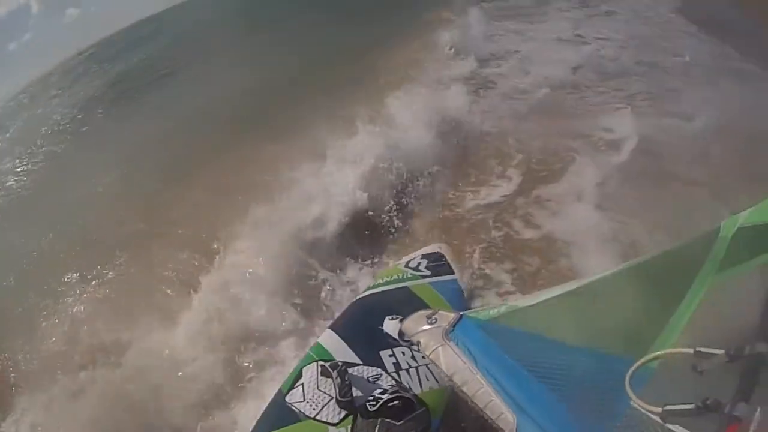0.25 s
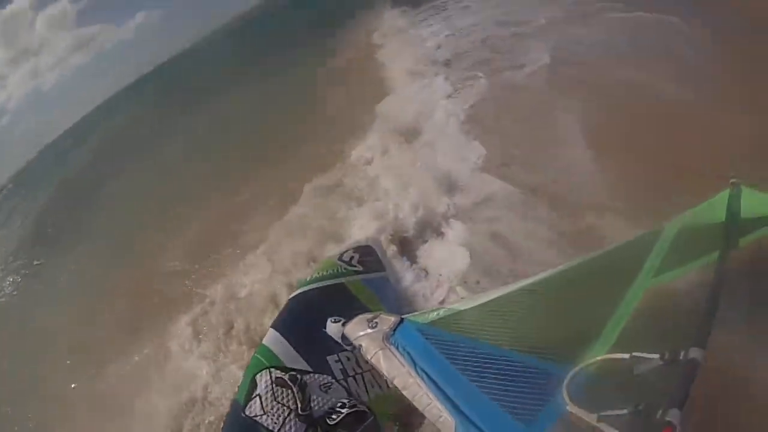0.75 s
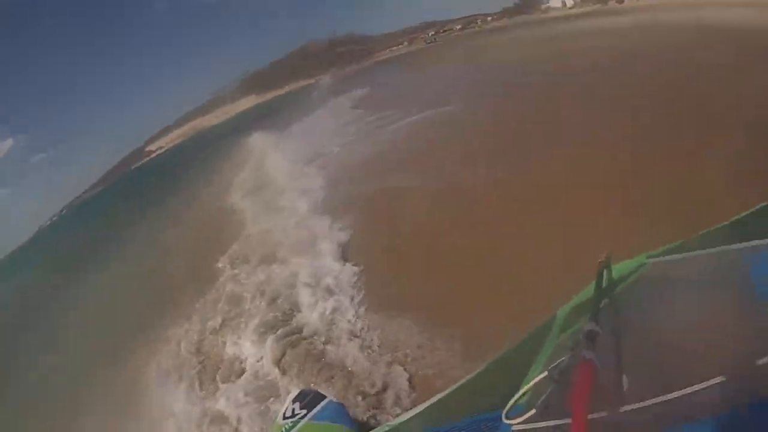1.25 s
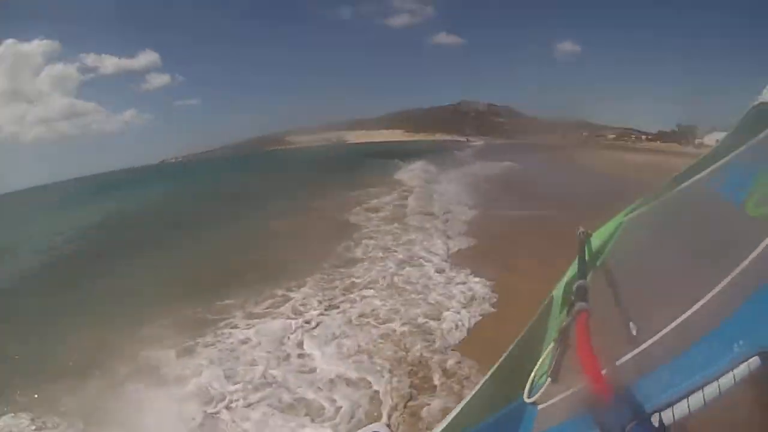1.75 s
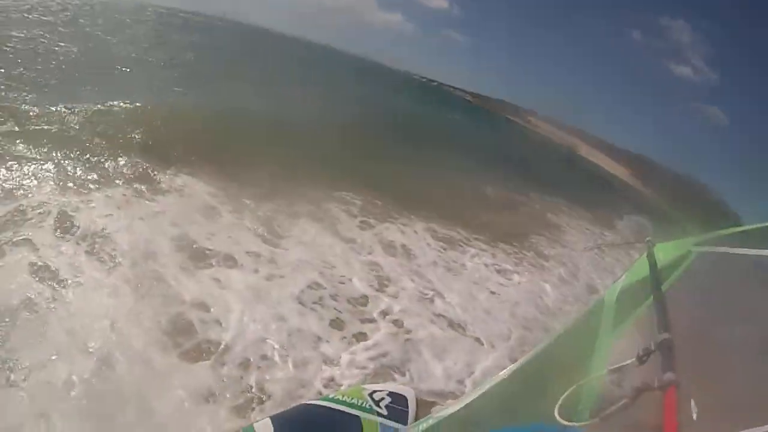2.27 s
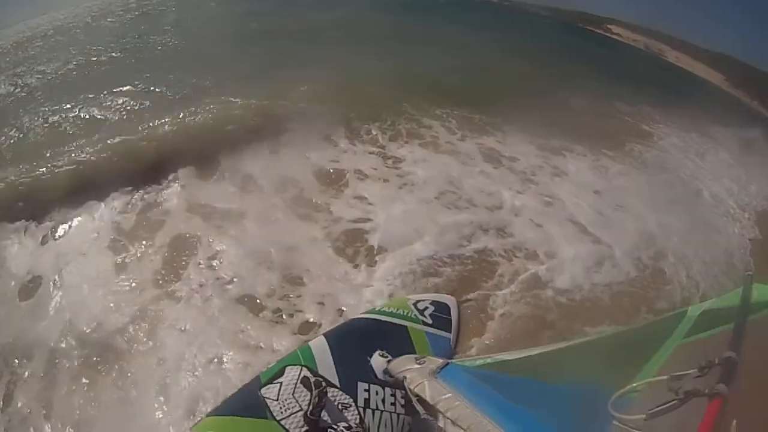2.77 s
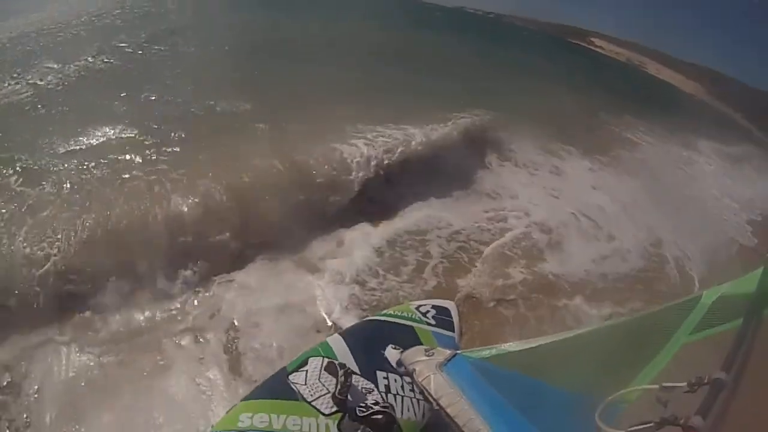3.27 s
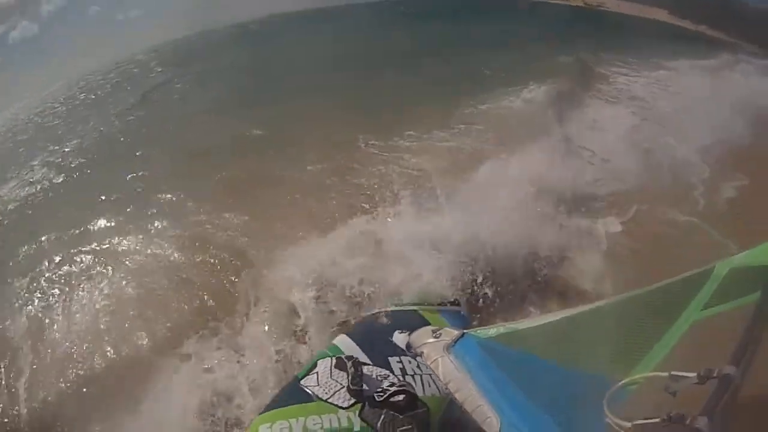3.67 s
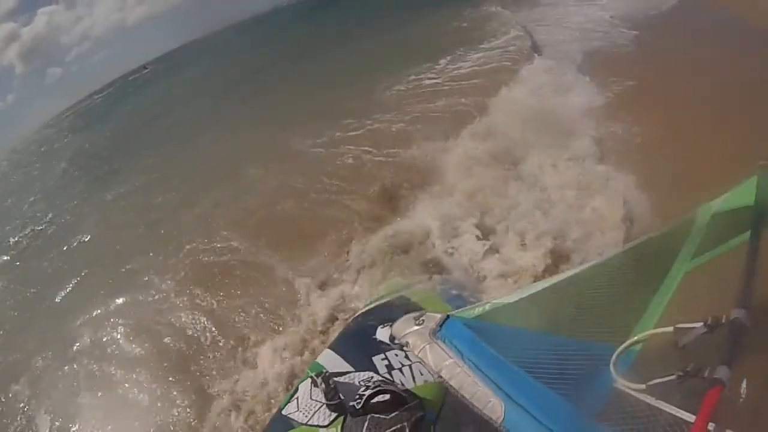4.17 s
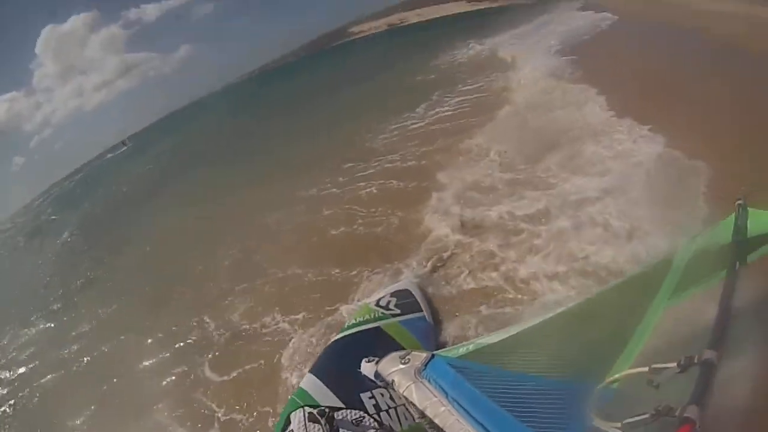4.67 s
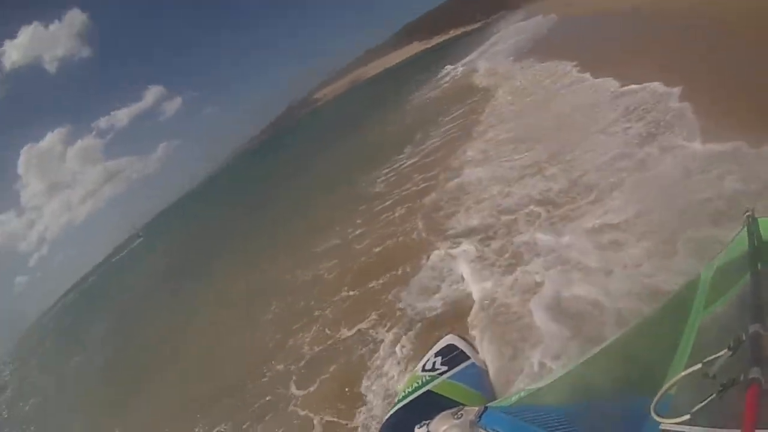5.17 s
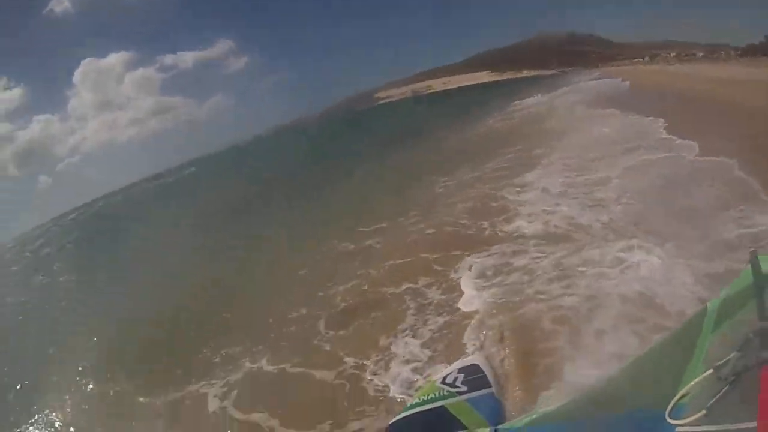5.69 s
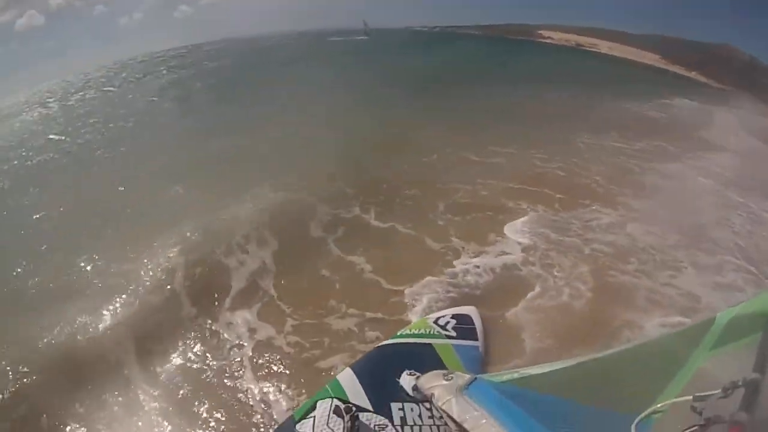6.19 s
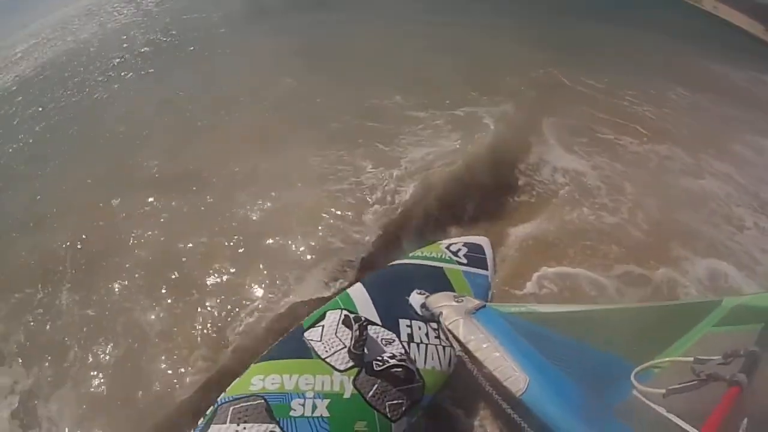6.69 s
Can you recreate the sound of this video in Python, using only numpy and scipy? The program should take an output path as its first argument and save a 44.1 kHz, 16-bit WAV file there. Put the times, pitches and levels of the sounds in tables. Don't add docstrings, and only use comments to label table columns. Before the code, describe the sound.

Inside a sealed housing, the surf sounds close, hollow and mono, with faint hiss underneath. It begins with strong foamy wash, bright spray and wet ticks, fading from about 0.5 s. Near 1.1 s the mount jolts with a low thump, hollow knock and small slap; the water is thinnest around 1.7 s. Wash rebuilds from 2 s, with a cluster of knocks at 2.5-2.8 s and fluttering gusts. Spray and a dull wave thud peak around 3-3.8 s, then drop back. Deep wind shoves hit near 3.9 s, and a brief wavering whistle peaks around 4.25 s. A sharp slap and click come at 4.77 s, amid faint grainy cloth rubbing until 5.3 s. Water calms, with a deep wind push at 5.5 s and a soft slap at 5.6 s. The hardest slap lands at 6.48 s, followed by splashy ticks and rising wash to the end near 6.9 s.

```python
import sys
import numpy as np
from scipy import signal
from scipy.fft import rfft, irfft
from scipy.io import wavfile
from scipy.ndimage import uniform_filter1d

SR = 44100
rng = np.random.default_rng(int(sys.argv[2]) if len(sys.argv) > 2 else 0)


def generate_wav(sig):
    pcm = np.round(np.clip(np.atleast_2d(sig).T, -1, 1) * 32767).astype(np.int16)
    wavfile.write(sys.argv[1], SR, pcm)


def decibels_to_gain(level_db):
    exponent = np.asarray(level_db, float) / 20
    return 10 ** exponent


N = 306054

# time in seconds, wash level in dB, airborne spray in dB over the wash.
SHORE_BREAK = [(0, -49, -6.5), (.46, -52, -5.5), (.7, -55, -8.5), (.97, -57.5, -7.5), (1.14, -60.5, -5.5),
               (1.68, -66.5, -3.5), (2.13, -63, -8), (2.45, -57.5, -9.5), (2.8, -55, -13), (3.05, -52, -6),
               (3.8, -51, -3), (4.0, -57.5, -5), (4.5, -57.5, -6.5), (4.93, -61, -5.5), (5.43, -64.5, -7),
               (6.47, -62, -8.5), (6.62, -50.5, -9), (6.94, -46.5, -7.5)]
MEAN_WASH_DB = -57


def rms_one(x):
    return x / np.sqrt(np.mean(x ** 2) + 1e-20)


def in_time(rows):
    s, *columns = np.transpose(rows)
    return [np.interp(np.arange(N) / SR, s, c) for c in columns]


def drift(rate_hz):
    stride = 40
    r = np.exp(-2 * np.pi * stride * rate_hz / SR)
    draws = rng.standard_normal(N // stride + 2002)
    slow = signal.lfilter([1], [1, -2 * r, r * r], draws)[2000:]
    return np.interp(np.arange(N) / stride, np.arange(len(slow)), rms_one(slow))


def coloured(x, spectrum):
    hz, db = np.transpose(spectrum)
    bins_hz = np.arange(N // 2 + 1) * SR / N + 1
    gain = decibels_to_gain(np.interp(np.log(bins_hz), np.log(hz), db))
    return rms_one(irfft(rfft(x) * gain, N))


def band(x, lo_hz, hi_hz):
    return signal.sosfilt(signal.butter(2, [lo_hz, hi_hz], "band", fs=SR, output="sos"), x)


def ring(clicks, hz, t60):
    r, w = decibels_to_gain(-60 / (t60 * SR)), 2 * np.pi * hz / SR
    return signal.lfilter([0, np.sin(w)], [1, -2 * r * np.cos(w), r * r], clicks + 1e-18)


def swell(length_s):
    t = np.arange(round(6 * length_s * SR)) / SR * 4 / length_s
    return t * np.exp(1 - t)


def add(out, s, sound):
    i = round(s * SR)
    out[i:i + len(sound)] += sound[:N - i]


def lumps(rows, column, steady_db):
    t = np.arange(N) / SR
    power = decibels_to_gain(steady_db) ** 2
    for row in rows:
        power = power + decibels_to_gain(row[column]) ** 2 * np.exp(-((t - row[0]) / row[1]) ** 2)
    return np.sqrt(power)


def foam(spectrum, per_s, spread_db, grain_share, patchy_db):
    sizes = decibels_to_gain(spread_db * np.minimum(rng.exponential(1, N), 4.)) * rng.choice([-1, 1], N)
    pops = sizes * (rng.random(N) < per_s * decibels_to_gain(4 * drift(8)) / SR)
    rush = rng.standard_normal(N)
    raw = coloured(np.sqrt(grain_share) * rms_one(pops) + np.sqrt(1 - grain_share) * rush, spectrum)
    together = drift(47)
    edges = np.geomspace(spectrum[0][0] * .7, min(spectrum[-1][0] * 1.2, 19000), 6)
    patches = []
    for lo, hi in zip(edges, edges[1:]):
        patches.append(band(raw, lo, hi) * decibels_to_gain(patchy_db * (together + 1.9 * drift(33))))
    return sum(patches[::2]) - sum(patches[1::2])


def housing(x):
    # frequency in Hz, width in Hz, boost in dB.
    wall_modes = [(1110, 59, 9), (1552, 410, 9.5), (1915, 62, 3.5), (2352, 600, 9), (3270, 470, 1),
                  (3750, 170, 1), (3700, 4500, -2.5), (4355, 860, -8), (4910, 220, 6.5), (5370, 400, 0.5),
                  (6110, 280, -8), (6700, 470, 1.5), (8540, 1400, -5), (11150, 670, 2), (12100, 860, 1)]
    for hz, width_hz, boost_db in wall_modes:
        a, w = decibels_to_gain(boost_db / 2), 2 * np.pi * hz / SR
        q = np.sin(w) * width_hz / hz / 2
        zeros = [1 + q * a, -2 * np.cos(w), 1 - q * a]
        poles = [1 + q / a, -2 * np.cos(w), 1 - q / a]
        x = signal.lfilter(zeros, poles, x)
    return x


def surf():
    # frequency in Hz, level in dB per Hz.
    thud_colour = [(35, -34), (60, -7.5), (199, 1), (674, -8.5), (980, -11), (1300, -10.5), (1690, -41),
                   (2860, -120)]
    wash_colour = [(410, -17), (700, -12), (1300, -7.5), (1540, -5.5), (2290, -3), (3000, -18.5),
                   (3900, -40), (6600, -120)]
    trickle_colour = [(1590, -35), (2700, -8.5), (3660, 1.5), (3970, 0.5), (4700, -3), (6110, -37),
                      (10300, -120)]
    spray_colour = [(2650, -27), (4500, -4), (5560, 3), (7420, -8), (8330, -13), (11300, -16.5),
                    (13600, -23.5), (15000, -30.5)]
    # centre in seconds, half length in seconds, thud in dB.
    dumping_wave = (3.32, 0.32, -55)
    # centre in seconds, half length in seconds, wash, spray, trickle in dB.
    near_splashes = [(.48, 0.0073, -47.5, -69, -55), (1.77, 0.055, -64.5, -71, -68.5),
                     (2.18, 0.022, -61, -77, -67), (2.55, .04, -57, -67, -68),
                     (2.76, 0.05, -57, -63.5, -73), (2.92, 0.013, -58, -68, -67),
                     (3.01, 0.039, -51, -51.5, -60), (3.23, 0.065, -53.5, -60, -61),
                     (3.63, 0.11, -52, -58, -59), (3.8, 0.1, -67, -71, -58.5), (4.31, 0.094, -55, -74, -61),
                     (4.36, 0.065, -58, -66, -63), (4.76, .08, -60, -68, -73), (5.14, 0.18, -63, -74, -74),
                     (5.59, 0.015, -61.5, -78, -70), (6.24, 0.046, -75, -71, -84),
                     (6.487, 0.01, -53, -64, -64), (6.64, 0.037, -60, -68, -73),
                     (6.82, 0.13, -51, -61, -72)]

    wash_db, spray_db = in_time(SHORE_BREAK)
    swing_db = wash_db - MEAN_WASH_DB
    thud_db = -60 + 0.34 * swing_db
    trickle_db = -65.5 + 0.97 * swing_db
    thud = foam(thud_colour, per_s=730, spread_db=3.5, grain_share=0.064, patchy_db=0.8)
    wash = housing(foam(wash_colour, per_s=1500, spread_db=6.0, grain_share=0.2, patchy_db=0.38))
    trickle = housing(foam(trickle_colour, per_s=750, spread_db=-2.5, grain_share=0.22, patchy_db=0.5))
    spray = housing(foam(spray_colour, per_s=2300, spread_db=3.0, grain_share=0.17, patchy_db=0.61))
    return (lumps([dumping_wave], column=2, steady_db=thud_db) * rms_one(thud)
            + lumps(near_splashes, column=2, steady_db=wash_db) * decibels_to_gain(1.5) * rms_one(wash)
            + lumps(near_splashes, column=3, steady_db=wash_db + spray_db) * decibels_to_gain(-1.86) * rms_one(spray)
            + lumps(near_splashes, column=4, steady_db=trickle_db) * rms_one(trickle))


def eddies(lo_hz, hi_hz, even_s):
    swing = band(band(rng.standard_normal(N), lo_hz, hi_hz), 0.82 * lo_hz, 1.36 * hi_hz)
    return rms_one(swing / np.sqrt(uniform_filter1d(swing ** 2, round(even_s * SR)) + 1e-9))


def wind():
    # time in seconds, buffet in dB, flutter in dB.
    breeze = [(0, -61, -64.5), (.9, -58, -70), (1.5, -62.5, -65), (2.3, -67, -56.5), (3.5, -58.5, -61.5),
              (4.4, -64, -62.5), (5.3, -60.5, -70.5), (6.3, -62.5, -60.5), (6.94, -61.5, -58.5)]
    # centre in seconds, half length in seconds, buffet in dB, flutter in dB.
    gusts = [(.23, 0.034, -70, -58.5), (.49, .04, -55.5, -69), (.81, 0.041, -58, -63),
             (.99, 0.016, -49.5, -58), (1.07, 0.044, -52, -52.5), (1.25, 0.077, -68, -59.5),
             (1.62, 0.068, -58, -62.5), (1.79, 0.05, -54, -56.5), (2.03, 0.041, -60, -60),
             (2.09, 0.035, -64, -53), (2.36, 0.053, -57, -63), (2.44, 0.12, -75, -56.5),
             (2.6, 0.085, -51, -56.5), (2.76, 0.028, -56, -57), (2.84, 0.054, -71, -52.5),
             (2.97, 0.074, -54, -52), (3.18, 0.034, -56, -61), (3.32, 0.048, -53, -70),
             (3.6, 0.084, -55, -54), (3.79, 0.026, -67, -54.5), (3.97, 0.026, -48, -61),
             (4.13, 0.035, -49, -63), (4.55, 0.028, -56, -65), (4.68, 0.04, -54, -65),
             (5.03, 0.045, -58, -78), (5.39, 0.15, -62, -62), (5.53, 0.03, -58, -73),
             (5.9, 0.17, -54.5, -62), (6.62, 0.059, -60, -62), (6.79, 0.025, -64, -61)]
    wander_db = 1
    buffet_db, flutter_db = in_time(breeze)
    buffet = lumps(gusts, column=2, steady_db=buffet_db + wander_db * drift(2.7))
    flutter = lumps(gusts, column=3, steady_db=flutter_db + wander_db * drift(4.2))
    return buffet * eddies(12.3, 43.7, even_s=0.071) + flutter * eddies(38.0, 117.6, even_s=0.2)


def cavity():
    # time in seconds, level in dB.
    mouth_wind = [
        (0, 0.5),
        (.9, 0.5),
        (1.3, -3),
        (1.6, -6),
        (2.2, -2),
        (3.2, 2),
        (4.6, 3.5),
        (5.5, 2),
        (6.4, -0.5),
        (6.94, -6),
    ]
    # centre in seconds, half length in seconds, level in dB.
    puffs = [(1.1, 0.027, -54), (1.27, .04, -58), (1.74, .03, -57), (1.8, .02, -58), (1.845, .015, -58),
             (2.345, .01, -55), (2.44, .03, -58), (2.535, 0.011, -46), (2.6, 0.058, -49.5),
             (2.77, 0.03, -60), (3.345, .015, -50), (3.52, .04, -52), (3.62, .03, -52), (3.71, .02, -50),
             (3.82, 0.017, -44), (4.24, 0.055, -50), (4.37, 0.076, -58), (4.75, 0.053, -53),
             (5.1, 0.079, -61.5), (6.63, .04, -51.5), (6.88, 0.023, -59)]
    air = band(band(rng.standard_normal(N), 1386, 1810), 1393, 1660)
    swing_db = in_time(SHORE_BREAK)[0] - MEAN_WASH_DB
    flicker_db = 1.5 * drift(7.6)
    steady_db = -57.5 + 0.87 * swing_db + in_time(mouth_wind)[0] + flicker_db
    gain = lumps(puffs, column=2, steady_db=steady_db) * decibels_to_gain(-4.5)
    return np.minimum(gain, decibels_to_gain(-47.5)) * rms_one(air)


def narrow_rush(rows, width):
    out, rush = np.zeros(N), rng.standard_normal(N)
    for s, half_s, db, hz in rows:
        i = max(round((s - 3 * half_s) * SR), 0)
        j = min(round((s + 3 * half_s) * SR), N)
        fade = np.exp(-((np.arange(i, j) / SR - s) / half_s) ** 2 / 2)
        out[i:j] += decibels_to_gain(db) * fade * rms_one(band(rush[i:j], hz * (1 - width), hz * (1 + width)))
    return out


def sheets():
    # centre in seconds, half length in seconds, level in dB, resonance in Hz.
    water_sheets = [(.08, 0.087, -63, 5300), (0.38, 0.13, -63.5, 5200), (0.76, 0.14, -68, 5100),
                    (.2, .2, -65, 3300), (.65, 0.19, -72, 3260), (.25, .2, -70, 6800),
                    (3.5, .25, -68, 6800), (1.34, 0.12, -67, 2340), (1.52, 0.055, -71, 2200),
                    (2.5, 0.043, -71, 6700), (2.3, 0.052, -71, 4770), (2.92, .02, -71, 10500),
                    (2.92, .02, -74, 12200), (2.92, .015, -70, 7500), (3.03, .035, -64, 6600),
                    (5.592, 0.0071, -62, 2700), (5.595, .008, -67, 3200), (6.53, .04, -70, 5200),
                    (4.3, .04, -63, 3550), (4.33, 0.055, -64, 3000), (4.38, 0.051, -59, 2400),
                    (4.35, 0.027, -70, 6650), (6.456, 0.0068, -59, 5300), (6.484, 0.0078, -63, 5300),
                    (6.605, 0.012, -58, 5200), (6.65, 0.012, -60, 5300), (6.705, 0.017, -56, 5200),
                    (6.817, 0.018, -60, 5400), (6.66, .035, -73, 11000), (6.735, .015, -67, 9600),
                    (6.74, .02, -69, 11300), (2.985, .015, -68, 11500), (3.065, .008, -67, 11000),
                    (2.975, .012, -58, 5300), (3.04, .012, -58, 5300)]
    return narrow_rush(water_sheets, width=0.068)


def drops():
    # start in seconds, ring in dB, ring in Hz, tick in dB, tick brightness in dB per octave.
    lens_drops = [(0.191, -35, 5000, -62, 0), (0.4206, -50, 4900, -46, 3), (0.6194, -52, 5350, -69, 0),
                  (1.398, -40, 5830, -53, -7), (1.5833, -55, 3780, -58, -2), (2.5496, -47, 4030, -56, -3),
                  (2.6199, -55, 3620, -62, 0), (2.9672, -46, 5470, -59, 0), (3.022, -43, 5200, -45, 2),
                  (4.1194, -50, 5900, -53, 1), (4.6352, -58, 3770, -51, 5), (5.1696, -57, 3900, -72, 0),
                  (5.4053, -58, 5300, -47, -4), (5.508, -49, 3770, -53, 2), (6.4443, -42, 5250, -58, -2),
                  (6.4517, -48, 5400, -55, 9), (6.5949, -55, 5000, -70, 0), (6.678, -55, 5200, -56, 5),
                  (6.733, -55, 5200, -52, 4), (6.9037, -34, 4850, -63, 0)]
    # frequency in Hz, level in dB, t60 in seconds.
    cover_modes = [(5300, 0, .004), (6230, 2, 0.0045), (7270, 2, 0.005), (8340, -4, 0.004),
                   (10800, -3, .004), (11700, -6, .004), (13800, -22, .003)]
    out, t = np.zeros(N), np.arange(1200) / SR
    luck_db = rng.normal(0, 1.5, (len(lens_drops), len(cover_modes)))
    for (s, db, hz, tick_db, bright_db), extra_db in zip(lens_drops, luck_db):
        t60 = 43 / hz * (5000 / hz) ** 1.5
        tone = decibels_to_gain(db + 1.0 - 60 * t / t60) * (1 - np.exp(-t / 0.0008)) * np.sin(2 * np.pi * hz * t)
        tick = 0
        for (mode_hz, mode_db, mode_t60), e in zip(cover_modes, extra_db):
            tilt_db = bright_db * np.log2(mode_hz / 7500)
            tick = tick + decibels_to_gain(mode_db + e + tilt_db) * ring(t == 0, mode_hz, mode_t60)
        tick = (1 - np.exp(-t / .0003)) * band(tick, 4500, 14500)
        add(out, s + .0005, tone + decibels_to_gain(tick_db + 4.5) * tick)
    return out


def thumps():
    # start in seconds, peak in dB, pitch in Hz.
    jolts = [
        (1.054, -58, 129),
        (1.091, -40, 110),
        (1.1, -47, 240),
        (1.109, -43.5, 126),
        (1.118, -49.5, 220),
        (1.165, -45, 102),
    ]
    out, push = np.zeros(N), swell(.02)
    t = np.arange(len(push)) / SR
    for s, db, hz in jolts:
        add(out, s, decibels_to_gain(db - 3.0) * push * np.sin(2 * np.pi * hz * t))
    return out


def pressure_humps(rows):
    out = np.zeros(N)
    for s, db, hz in rows:
        reach = round(2 * SR / hz)
        cycles = np.arange(-reach, reach) * hz / SR
        add(out, s - 2 / hz, decibels_to_gain(db) * np.exp(-(cycles / 0.62) ** 2) * np.cos(2 * np.pi * cycles))
    return out


def shoves():
    # centre in seconds, peak in dB, pitch in Hz.
    blasts = [
        (1.059, -50, 70),
        (2.724, -44, 45),
        (2.999, -45, 55),
        (3.492, -45, 45),
        (3.61, -42, 38),
        (3.942, -37.5, 36.3),
        (4.659, -38, 38),
        (5.506, -37, 27),
        (6.768, -41, 36),
    ]
    suctions = [
        (1.066, -46, 55),
        (2.007, -42.5, 45),
        (2.331, -42.5, 50),
        (2.665, -49, 40),
        (3.2, -40.5, 30),
        (3.254, -47, 45),
        (4.109, -48, 38),
        (4.54, -45, 38),
    ]
    return pressure_humps(blasts) - pressure_humps(suctions)


def knocks():
    # start in seconds, ring in dB, ring in Hz, t60 in seconds,
    # crack in dB.
    mount_knocks = [(1.082, -44, 1130, .06, -62), (1.0966, -31.5, 1130, .04, -51),
                    (1.119, -48, 1110, .07, -60), (1.178, -48, 1110, .05, -62),
                    (1.194, -50, 1110, .05, -62), (1.163, -42, 1180, .04, -49),
                    (1.81, -59, 1094, 0.15, -66), (1.855, -54, 1110, .1, -66), (2.392, -52, 1080, .07, -64),
                    (2.0859, -50, 1117, 0.1, -59), (2.3488, -63, 1110, 0.091, -55),
                    (2.548, -44, 1150, 0.079, -39), (2.574, -36.5, 1180, 0.077, -45),
                    (2.585, -41, 1110, 0.15, -40), (2.626, -45, 1140, 0.095, -44),
                    (2.657, -39.5, 1120, 0.11, -52), (2.735, -48, 1130, 0.096, -59),
                    (2.7723, -46, 1130, .08, -56), (2.822, -44.5, 1133, 0.11, -54),
                    (2.9482, -48, 1160, .06, -56), (3.013, -47, 1150, .08, -51),
                    (3.14, -46, 1120, 0.089, -62), (3.45, -50, 1120, .08, -62),
                    (4.3028, -45.5, 1120, 0.12, -48), (4.7665, -30, 2190, .016, -50),
                    (5.5902, -69, 1210, .1, -52), (6.1596, -53, 1110, 0.09, -62),
                    (6.4817, -51, 1114, 0.099, -51)]
    # frequency in Hz, level in dB, t60 in seconds.
    mount_modes = [(1500, -6, 0.05), (1710, 2.5, 0.018), (2440, -7, .02), (4630, -11, 0.015)]
    out, t = np.zeros(N), np.arange(round(.15 * SR)) / SR
    luck_db = rng.normal(0, 2.5, (len(mount_knocks), len(mount_modes)))
    for (s, db, hz, t60, crack_db), extra_db in zip(mount_knocks, luck_db):
        hum = decibels_to_gain(db - 60 * t / t60) * (1 - np.exp(-t / 0.0038)) * np.sin(2 * np.pi * hz * t)
        crack = 0
        for (mode_hz, mode_db, mode_t60), e in zip(mount_modes, extra_db):
            crack = crack + decibels_to_gain(mode_db + e) * ring(t == 0, mode_hz, mode_t60)
        add(out, s, hum + decibels_to_gain(crack_db - 0.5) * band(crack, 970, 5600))
    return out


def slaps():
    # start in seconds, peak in dB, t60 in seconds.
    board_slaps = [
        (1.099, -47, 0.045),
        (1.163, -50, 0.02),
        (2.179, -51, 0.032),
        (4.767, -41, 0.015),
        (5.589, -50, 0.035),
        (6.4802, -35.5, 0.023),
        (6.484, -39, 0.04),
    ]
    out, t = np.zeros(N), np.arange(3000) / SR
    for s, db, t60 in board_slaps:
        burst = rms_one(housing(band(band(rng.standard_normal(len(t)), 300, 2800), 200, 3000)))
        add(out, s, decibels_to_gain(db - 2.5 - 60 * t / t60) * (1 - np.exp(-t / 0.00077)) * burst)
    return out


def streaks():
    # centre in seconds, half length in seconds, level in dB, resonance in Hz.
    thin_streaks = [(1.165, 0.0035, -59, 1620), (2.54, .015, -54, 1720), (2.77, 0.022, -53, 1670),
                    (2.742, .012, -55, 1900), (2.89, 0.01, -56, 1650), (2.84, 0.046, -75, 3720),
                    (2.92, 0.016, -67, 3720), (3.0, 0.041, -62, 3730), (3.0, .03, -54, 1770),
                    (3.4, 0.24, -68, 3740), (4.265, 0.032, -46.5, 1420), (4.34, 0.03, -59, 1420),
                    (4.345, .025, -53, 1696), (4.43, 0.0081, -59, 1405), (4.43, 0.013, -55, 1646)]
    return narrow_rush(thin_streaks, width=0.023)


def whistle():
    # time in seconds, peak in dB, pitch in Hz, length in seconds.
    tone_swells = [(4.148, -48, 1500, .012), (4.158, -42, 1551, .006), (4.168, -42, 1500, 0.01),
                   (4.181, -35.5, 1480, 0.015), (4.194, -40.5, 1570, .016), (4.207, -41, 1470, .016),
                   (4.217, -42, 1530, .009), (4.224, -43, 1600, 0.0082), (4.231, -35, 1601, 0.0092),
                   (4.238, -32, 1580, 0.0089), (4.244, -33, 1518, .006), (4.253, -33, 1580, 0.0074),
                   (4.257, -24.5, 1537, 0.01), (4.264, -32, 1623, 0.0062), (4.27, -29, 1483, .011),
                   (4.277, -24.5, 1593, 0.0086), (4.281, -30, 1633, .006), (4.291, -29.5, 1617, 0.0063),
                   (4.295, -41, 1597, .006), (4.304, -40, 1577, .006), (4.313, -40, 1500, .009),
                   (4.328, -37, 1540, .01), (4.339, -39, 1600, .011), (4.354, -36, 1604, .007),
                   (4.362, -39, 1618, .007), (4.375, -43, 1523, 0.013), (4.398, -47.5, 1600, .012),
                   (4.425, -46, 1620, .01)]
    level, weighted_hz = np.zeros(N), np.zeros(N)
    for s, db, hz, length_s in tone_swells:
        puff = decibels_to_gain(db) * swell(length_s)
        add(level, s - .003, puff)
        add(weighted_hz, s - .003, hz * puff)
    pitch_hz = weighted_hz / (level + 1e-9)
    tone = level * np.sin(2 * np.pi * np.cumsum(pitch_hz) / SR)
    return band(band(band(tone, 1320, 1710), 1300, 1780), 1280, 1800)


def rustle():
    # centre in seconds, half length in seconds, level in dB.
    cloth_drags = [
        (4.65, 0.18, -64),
        (4.768, .0015, -52),
        (4.93, .03, -70),
        (4.995, 0.016, -66),
        (5.055, 0.016, -65),
        (5.125, .015, -63),
        (5.15, 0.0063, -63),
        (5.175, .008, -66),
        (5.215, .018, -64),
        (5.305, .01, -66),
    ]
    cloth_colour = [(3000, -20), (3900, -3), (4500, 4), (5400, 3), (6200, -20)]   # (Hz, dB per Hz)
    cloth = foam(cloth_colour, per_s=500, spread_db=6.0, grain_share=0.31, patchy_db=0.5)
    return lumps(cloth_drags, column=2, steady_db=-96) * rms_one(cloth)


def scene():
    water = surf() + sheets() + drops() + slaps()
    air = wind() + cavity() + shoves() + streaks() + whistle()
    handling = thumps() + knocks() + rustle()
    mono = water + air + handling
    return np.array([mono, mono])


def band_limit(x):
    return signal.sosfilt(signal.butter(12, 15270, fs=SR, output="sos"), x)


def record(dry):
    # frequency in Hz, level in dB per Hz.
    hiss_colour = [(180, -18), (300, -7), (1230, -11.5), (1470, -11.5), (1970, -33), (2400, -9.5),
                   (10800, -23.5), (15000, -30.5)]
    hiss = decibels_to_gain(-66) * coloured(rng.standard_normal(N), hiss_colour)
    top_cut = signal.cheby2(16, 50, 15600, fs=SR, output="sos")
    return band_limit(signal.sosfilt(top_cut, dry + hiss))


dry = scene()
out = record(dry)
generate_wav(out)
```